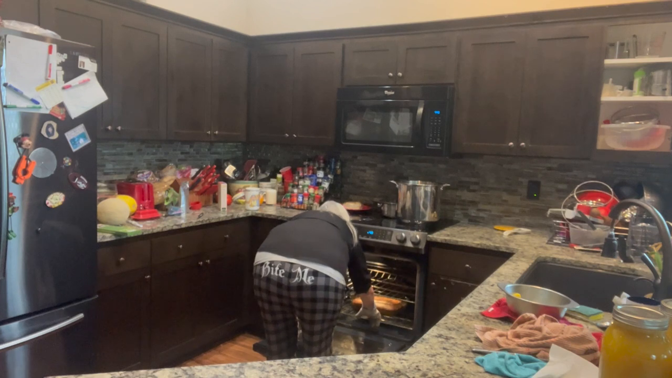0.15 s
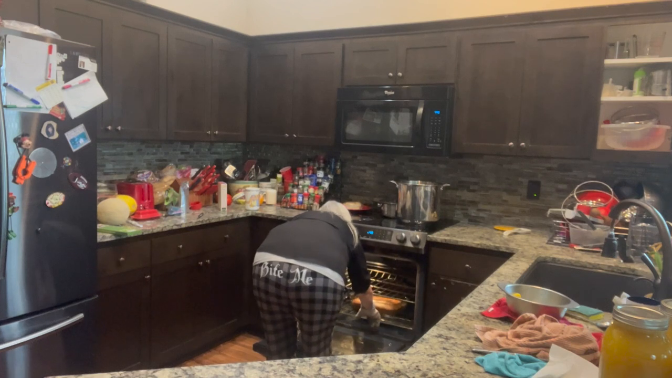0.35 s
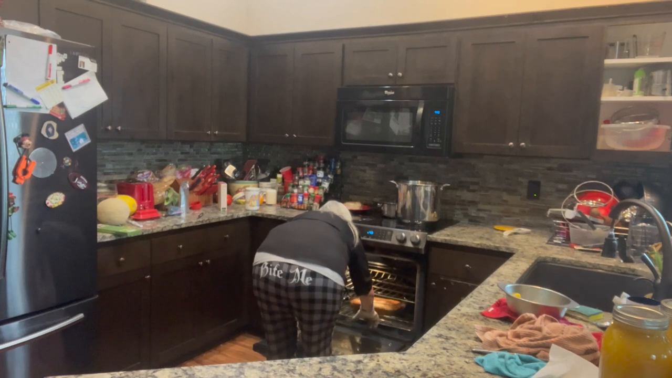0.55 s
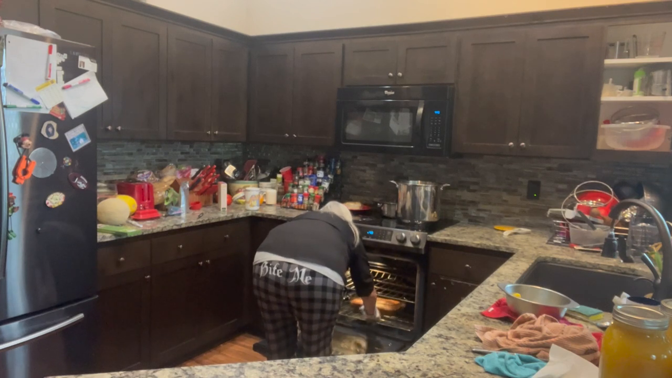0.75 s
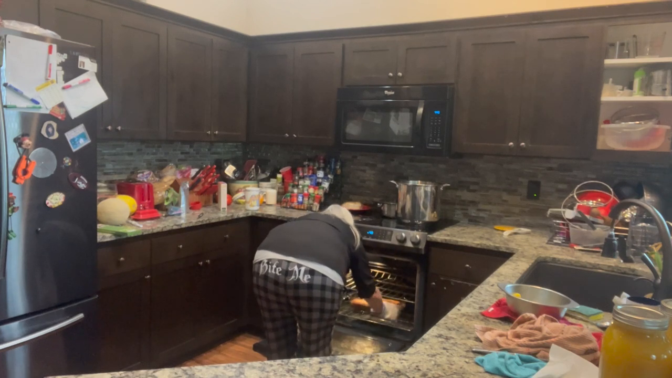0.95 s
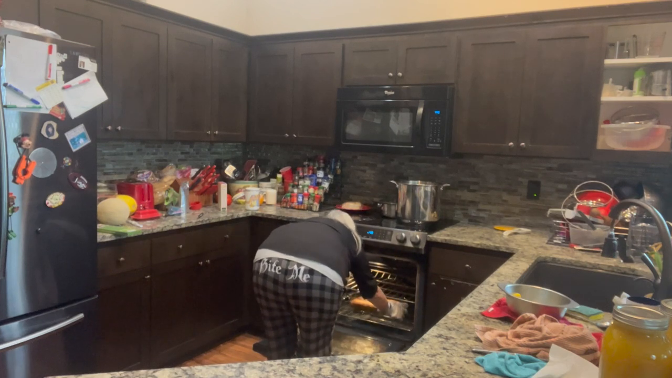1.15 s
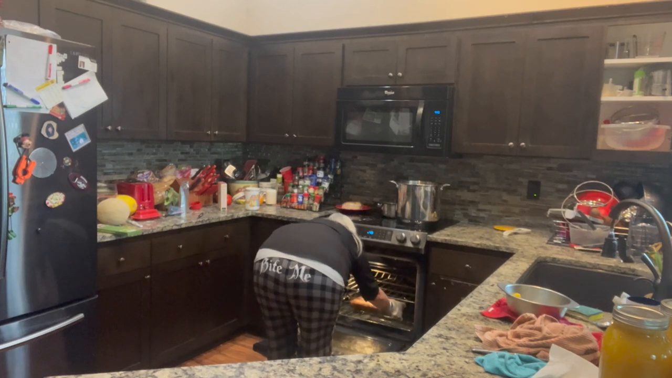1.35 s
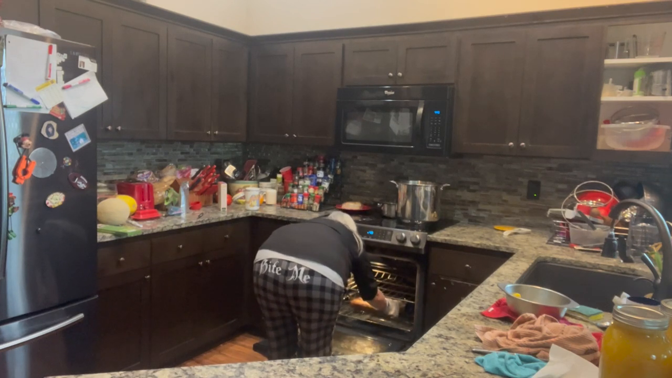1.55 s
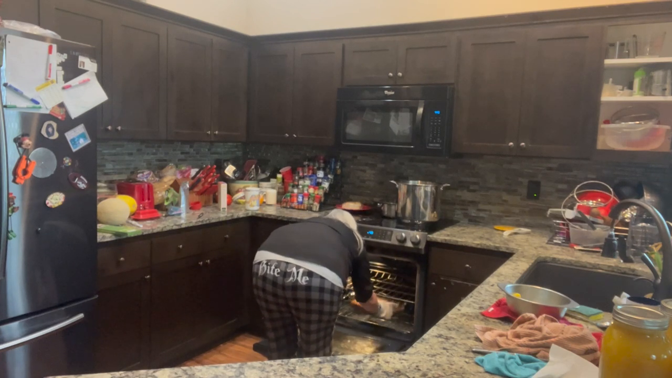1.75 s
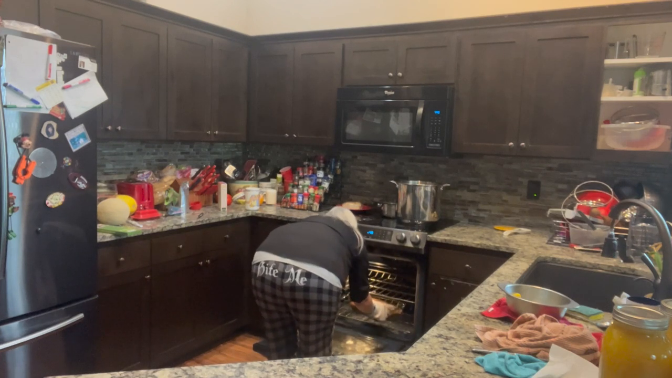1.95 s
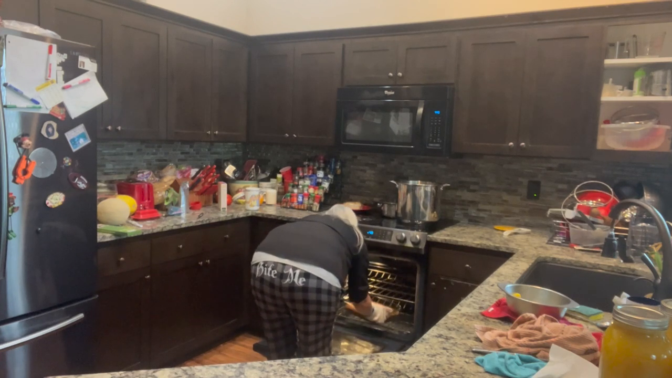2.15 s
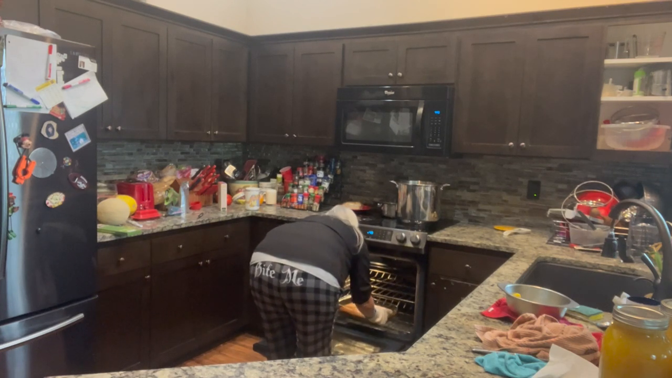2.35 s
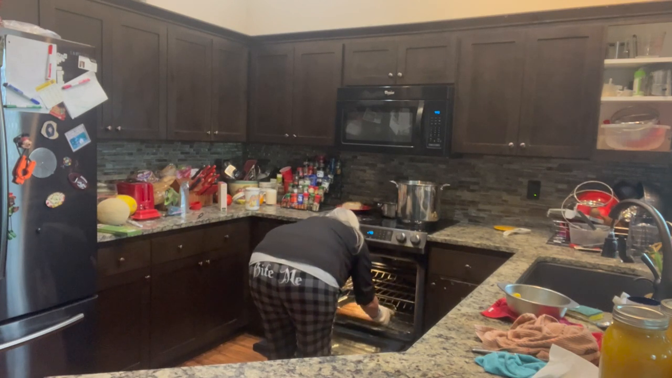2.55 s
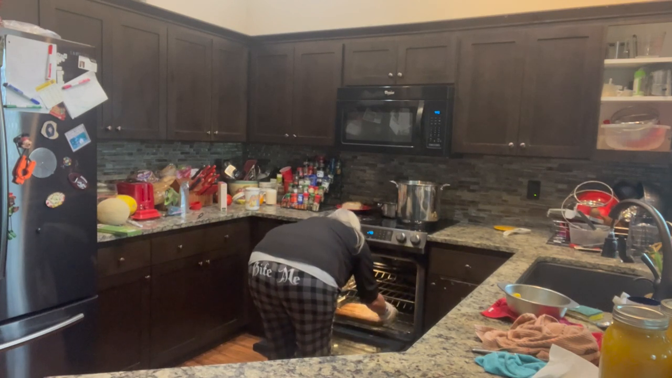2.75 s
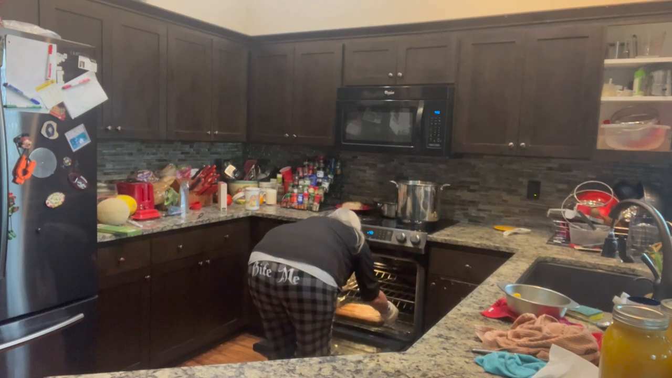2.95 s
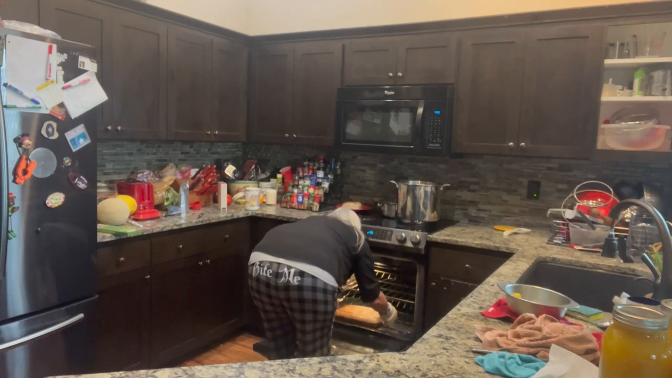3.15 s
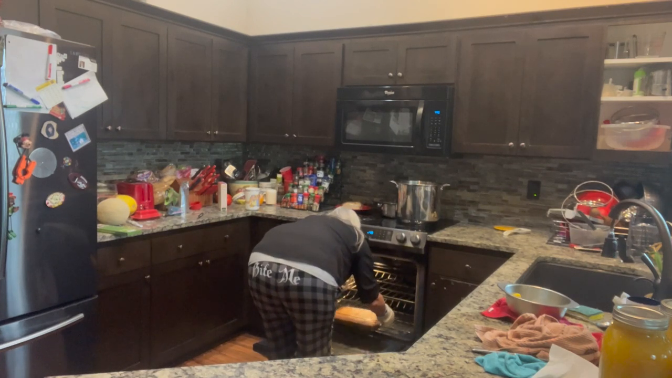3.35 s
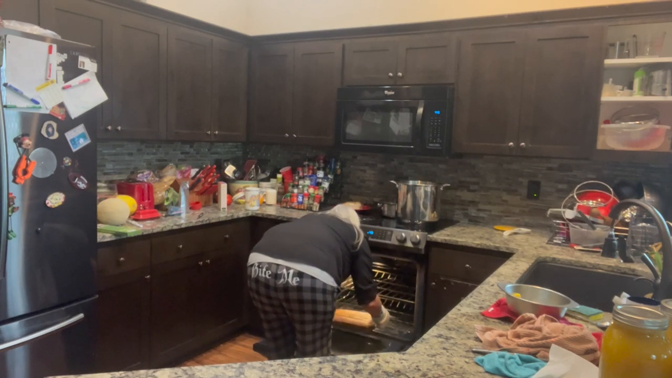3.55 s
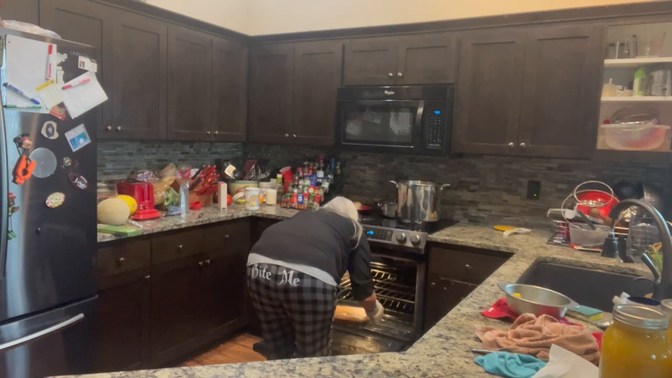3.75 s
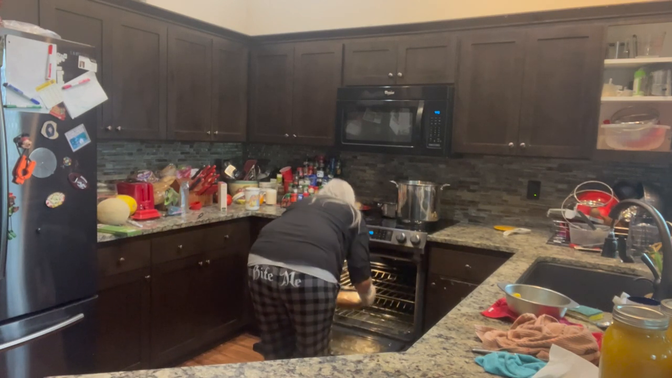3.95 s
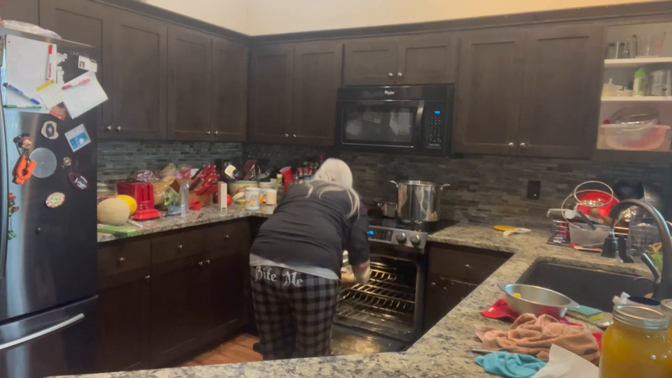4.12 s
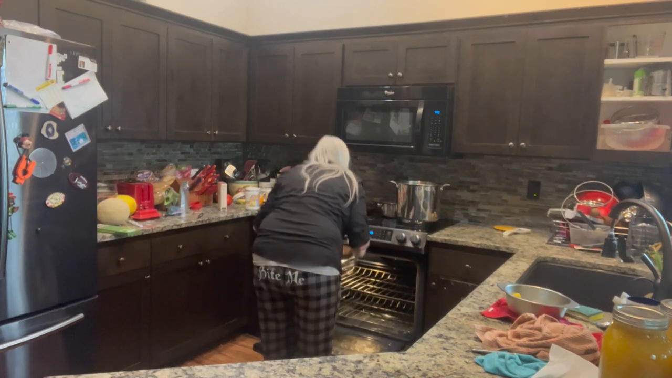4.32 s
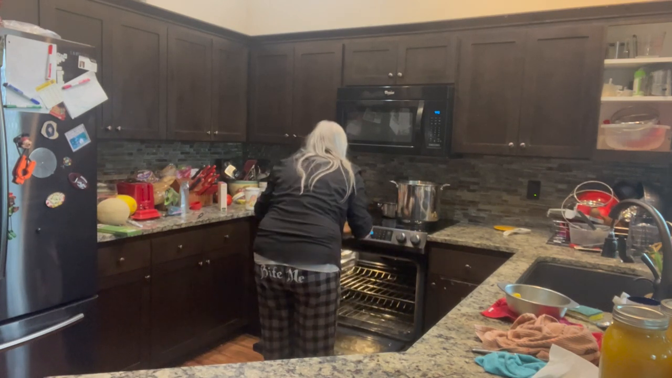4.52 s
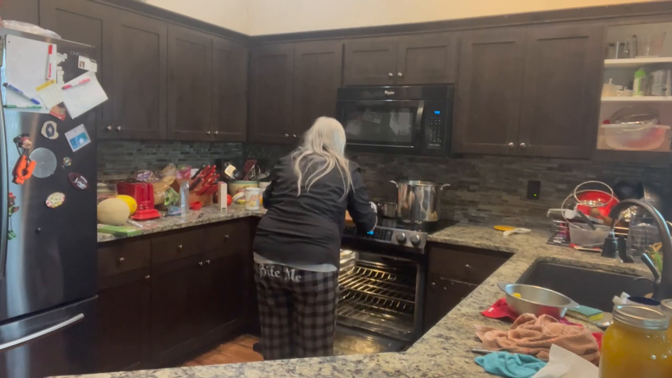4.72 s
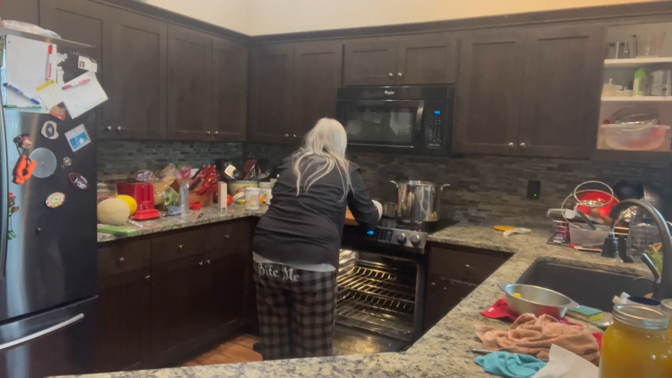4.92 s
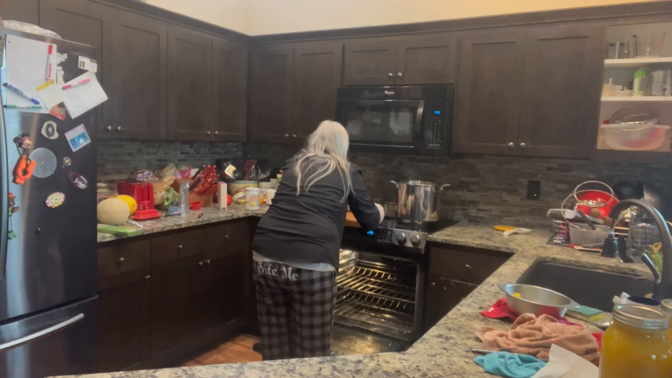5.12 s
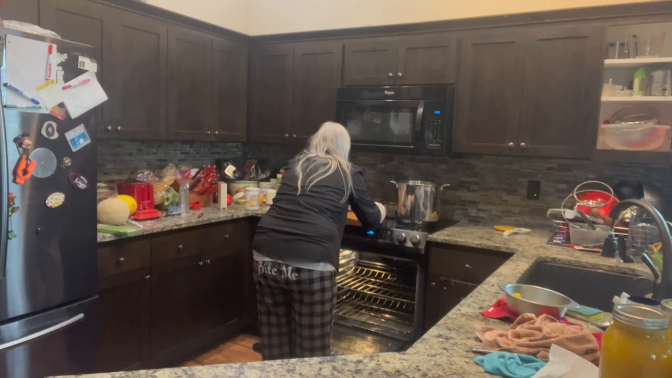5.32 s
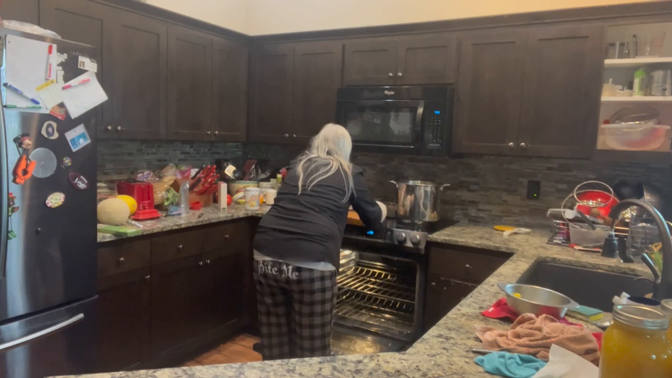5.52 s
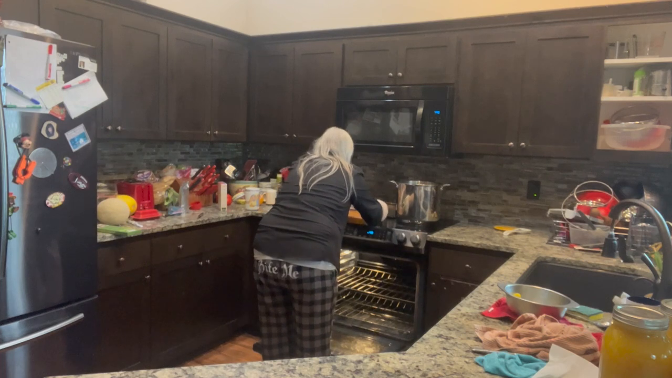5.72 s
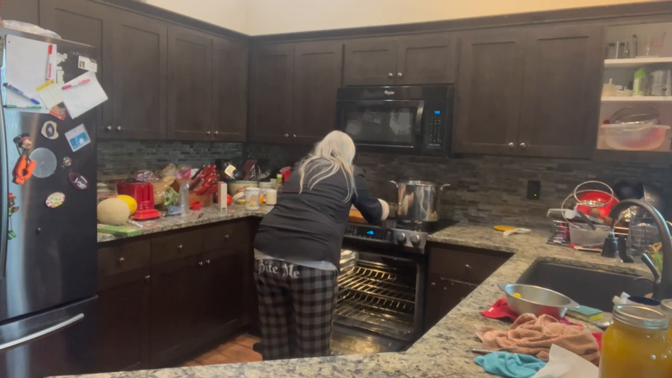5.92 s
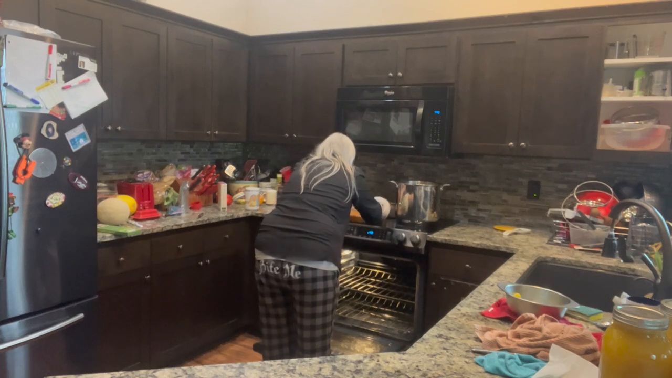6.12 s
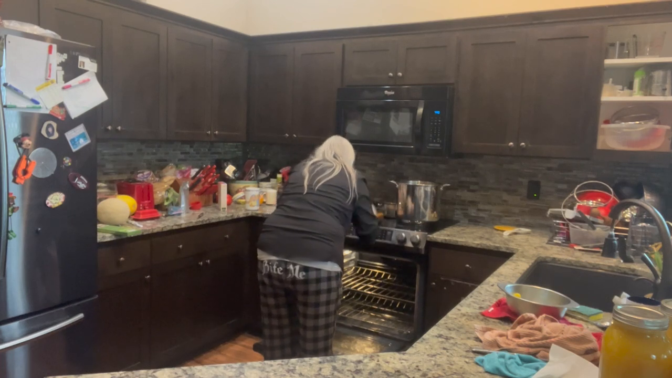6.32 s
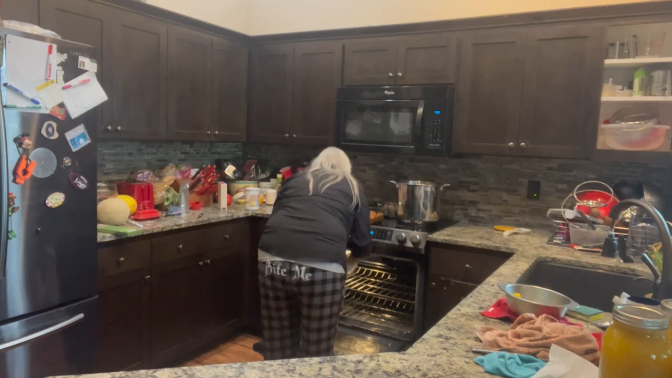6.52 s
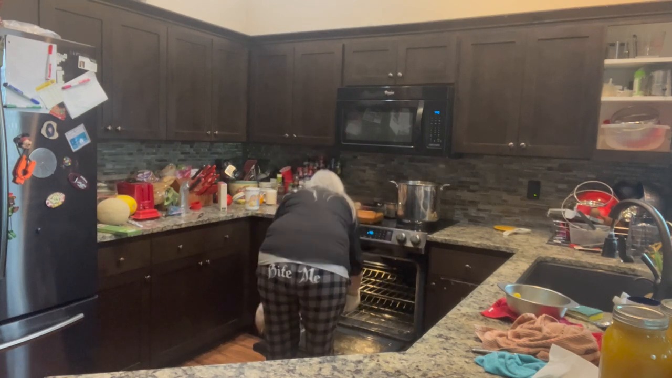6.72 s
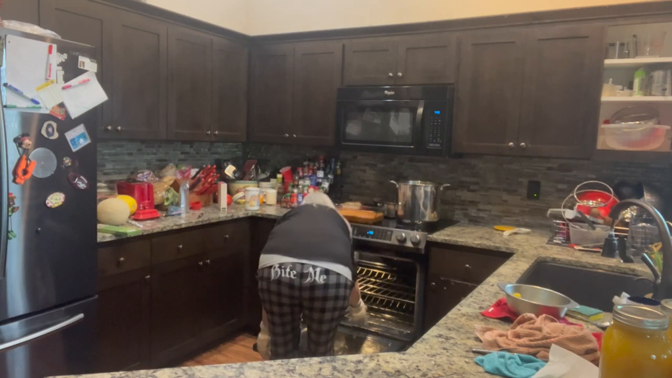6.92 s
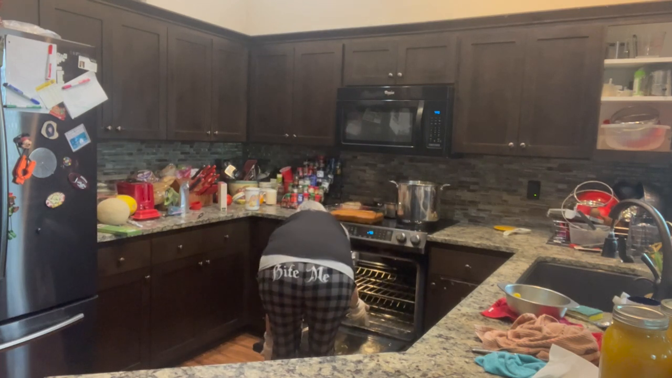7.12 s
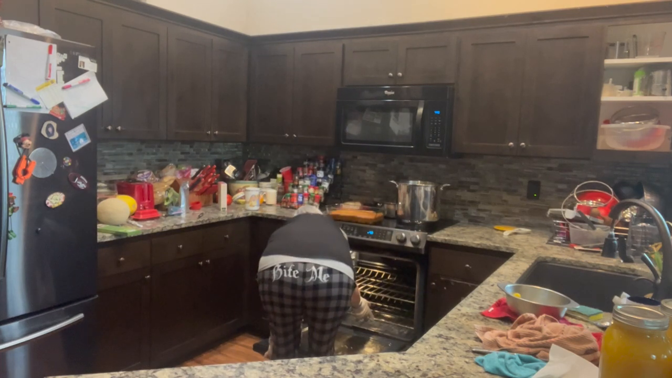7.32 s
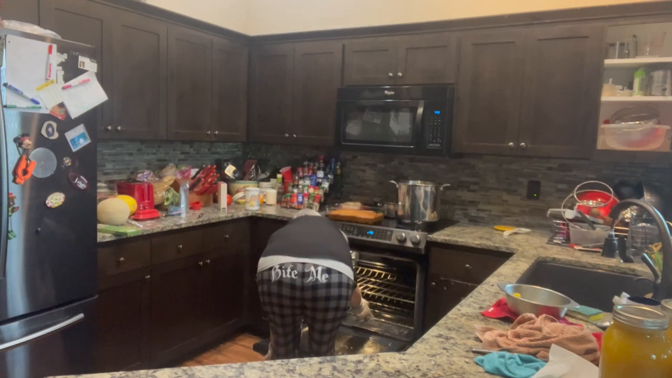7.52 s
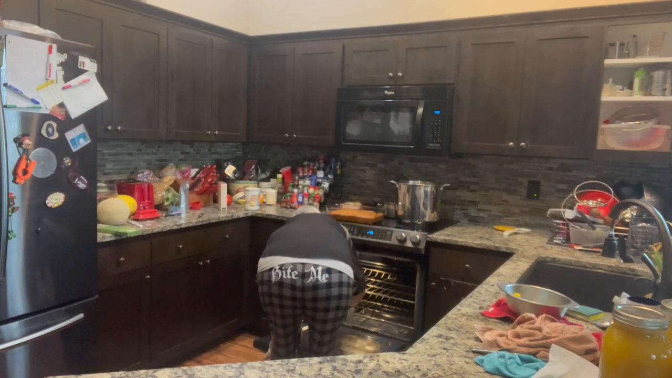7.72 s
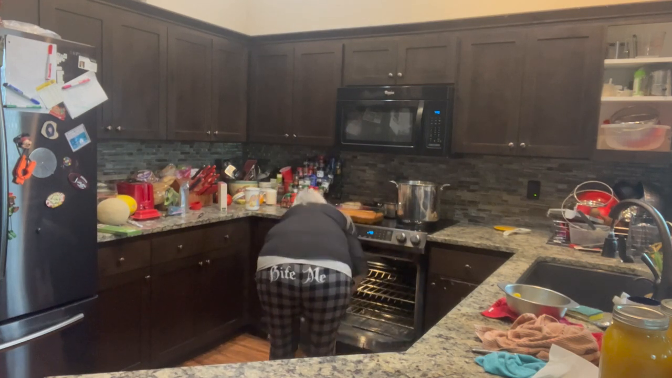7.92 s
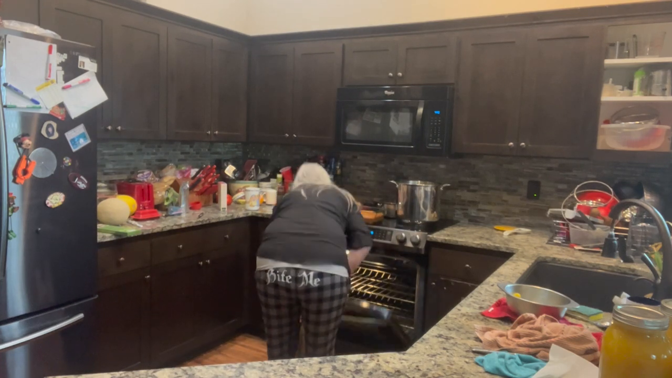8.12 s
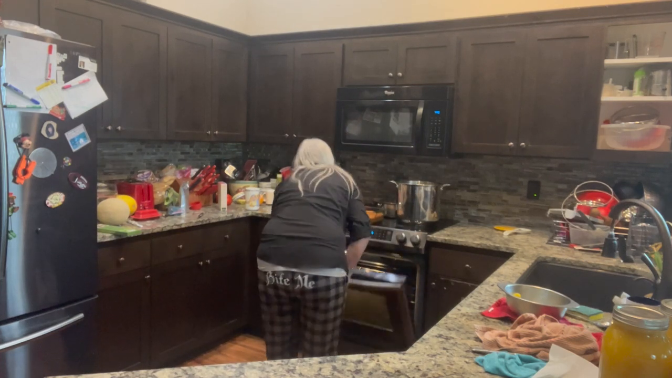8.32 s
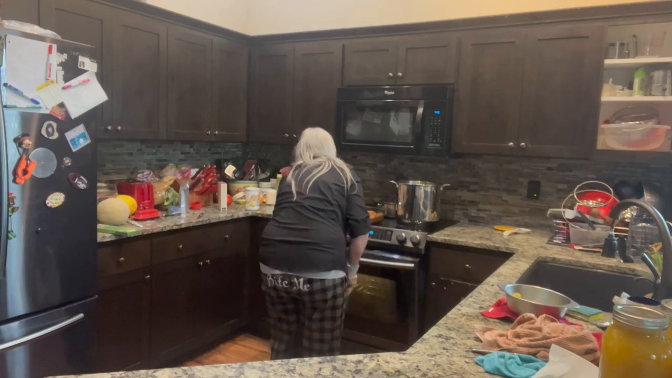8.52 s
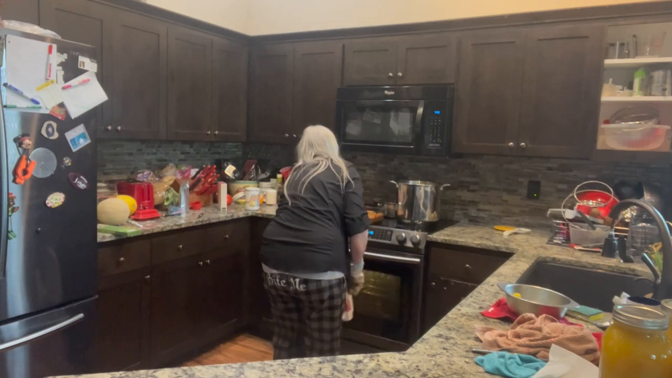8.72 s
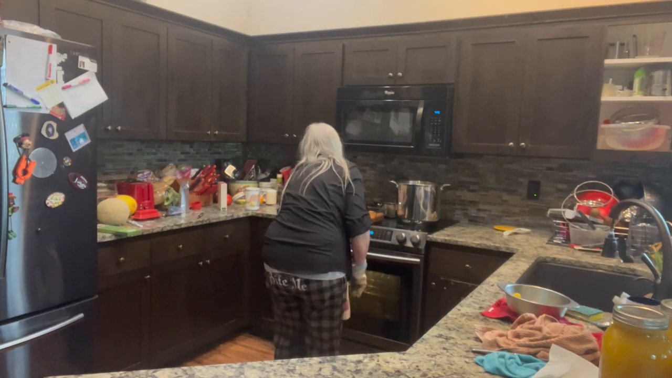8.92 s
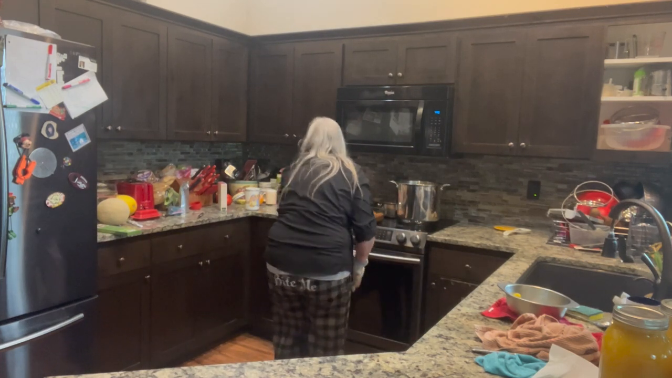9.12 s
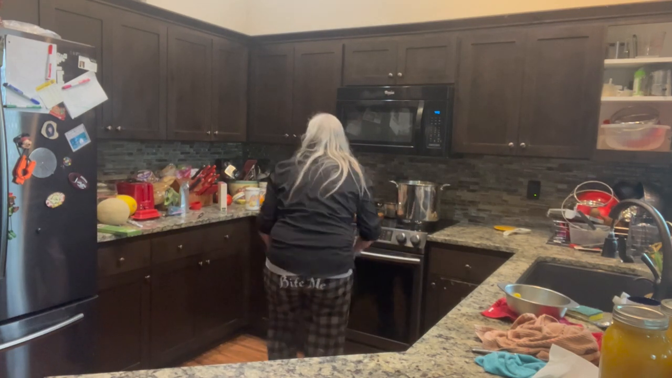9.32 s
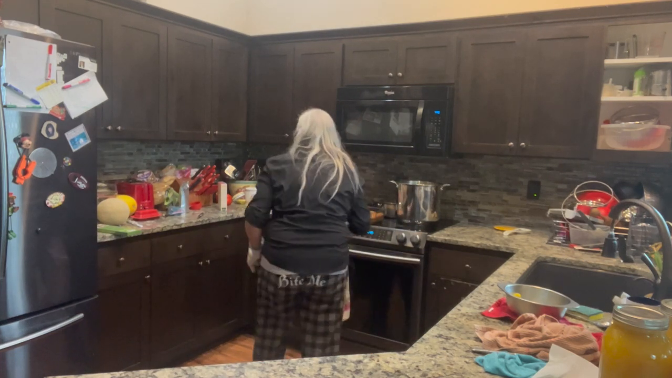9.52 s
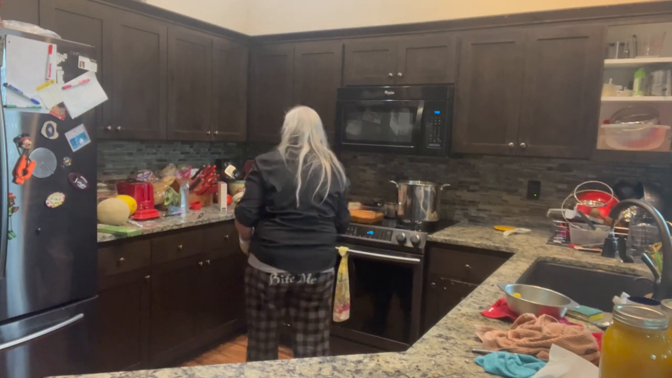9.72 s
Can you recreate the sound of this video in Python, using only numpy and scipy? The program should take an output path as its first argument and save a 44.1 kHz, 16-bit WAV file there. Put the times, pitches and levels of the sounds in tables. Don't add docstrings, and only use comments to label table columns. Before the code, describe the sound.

A home kitchen heard from across the counter on close stereo camera microphones: low appliance hum, faint hiss, and very faint fast lens ticking from about 2 s. At the start metal drags lightly, then at 0.4 s an oven rack jolts with a loud, dry double clank, its wires ringing on. A tiny ping and mitt rustle come near 1.1-1.3 s. At 1.7 s another knock, then scraping and squeaking wire until about 2.6 s; at 3.4 s the rack stops with a clank. Quiet ringing fades. At 5.1 s a pan lands on the stovetop with a hollow, booming thud, then slides and taps until 6.2 s. Soft cloth rustles at 6.4-6.9 s. From 7.0 s the rack scrapes back, ending in a loud ringing clash at 7.35 s. The door moves at 8.4 s with a click and squeak, slams with a deep metallic thump at 8.7-8.8 s, and settles with faint scrapes and a low thud near 9.55 s.

```python
import sys
import numpy as np
from scipy import signal
from scipy.fft import rfft, irfft, next_fast_len
from scipy.io import wavfile
from scipy.ndimage import uniform_filter1d, map_coordinates

SR = 44100
rng = np.random.default_rng(int(sys.argv[2]) if len(sys.argv) > 2 else 0)


def pcm_store(signal):
    levels = np.round(np.clip(np.atleast_2d(signal), -1, 1) * 32767)
    wavfile.write(sys.argv[1], SR, levels.astype(np.int16).T)


def attenuation_scalar(level_db):
    decades = np.asarray(level_db, float) / 20
    return 10 ** decades


N = 434826

# f/Hz, level/dB per Hz
SHEET_COLOUR = [(18, -36.5), (30, -14.5), (48, -18), (84, -2.5), (118, 0.5), (285, -11.5), (324, -12),
                (430, -9.5), (543, -13.5), (618, -11.5), (1010, -16.5), (4770, -31), (8200, -37),
                (10600, -45.5), (14500, -57.5)]
# f/Hz, correlation/-1..1
PORT_LIKENESS = [(60, 0.98), (130, 0.99), (290, .78), (620, 0.34), (1360, 0.3), (2950, -0.18),
                 (5500, 0.052), (7400, -0.88), (8300, -0.91), (9300, -0.54), (11000, 1), (12500, 0.2),
                 (14500, -.8)]
# f/Hz, left minus right/dB
PORT_BALANCE = [(60, -0.5), (150, -1.0), (370, -1.5), (920, -2), (2280, -1.5), (5660, -7), (14000, 3.5)]
BAND_EDGES_HZ = [25, 90, 250, 800, 1500, 2500, 4500, 8600, 16000]
BAND_COLOUR = [0, 0, 1, 2, 2, 3, 3, 4]


def unit(x):
    return x / np.sqrt(np.mean(x ** 2) + 1e-20)


def along(points, hz):
    f, v = np.transpose(points)
    return np.interp(np.log(hz + 1), np.log(f + 1), v)


def curves(rows, t):
    s, *columns = np.transpose(rows)
    return np.array([np.interp(t, s, column) for column in columns])


def wobble(rate):
    knots = rng.standard_normal(int(N * rate / SR) + 4)
    return map_coordinates(knots, [np.arange(N) * rate / SR])


def filtered(x, response):
    m = next_fast_len(x.shape[-1] + 8192)
    spectrum = rfft(x, m) * response(np.fft.rfftfreq(m, 1 / SR))
    return irfft(spectrum, m)[..., :x.shape[-1]]


def peaks(rows, f):
    total = 0
    for k, (centre, width, db) in enumerate(rows):
        damping = 1j * f * width
        total = total + (-1) ** k * attenuation_scalar(db) * damping / (centre * centre - f * f + damping + 1e-9)
    return total


def diffuse(gain, likeness, balance, size=N):
    def mid_side_gain(hz):
        turn = np.arccos(np.clip(along(likeness, hz), -1, 1)) / 2
        return gain(hz) * [np.cos(turn), np.sin(turn)]

    mid, side = filtered(rng.standard_normal((2, size)), mid_side_gain)
    ports = np.array([mid + side, mid - side])
    return unit(filtered(ports, lambda hz: attenuation_scalar(np.outer([.5, -.5], along(balance, hz)))))


def split(x, edges):
    edges = np.array(edges)[:, None, None]
    above = lambda hz: 1 / (1 + (edges / (hz + 1)) ** 10)
    return filtered(x, lambda hz: -np.diff(above(hz), axis=0))


def patchy(x, depth_db):
    z = signal.stft(x, nperseg=1024)[2]
    field = uniform_filter1d(rng.standard_normal(z.shape[1:]), size=6, axis=1)
    return signal.istft(z * attenuation_scalar(depth_db * unit(field)), nperseg=1024)[1][:, :x.shape[1]]


def flutter(seconds, rate):
    steps = np.arange(0, seconds, 32 / SR)
    knots = rng.standard_normal((4, int(seconds * rate) + 4))
    real, imag = np.array([map_coordinates(row, [steps * rate]) for row in knots]).reshape(2, 2, -1)
    return steps, real + 1j * imag


def voiced(swing, hz, size):
    share = np.clip(along(PORT_LIKENESS, hz), -1, 1)
    pair = np.array([swing[0], share * swing[0] + np.sqrt(1 - share ** 2) * swing[1]])
    pair = pair * attenuation_scalar(along(PORT_BALANCE, hz) * np.array([[.5], [-.5]]))
    pair = np.repeat(pair, 32, axis=1)[:, :size]
    turn = 2 * np.pi * hz * np.arange(size) / SR
    return pair.real * np.sin(turn) + pair.imag * np.cos(turn)


def tones(rows, rise):
    out, size = np.zeros((2, N + SR)), SR // 4
    for s, hz, db, t60 in rows:
        t, waver = flutter(.26, rate=25 + .01 * hz)
        swing = attenuation_scalar(db - 60 * t / t60) * (1 - np.exp(-t / rise)) * (0.7 + 0.21 * waver)
        swing = swing * np.cos(np.pi / 2 * t / t[-1])
        out[:, round(s * SR):][:, :size] += voiced(swing, hz, size)
    return out[:, :N]


def appliances():
    # f/Hz, width/Hz, level/dB
    motor_peaks = [(67, 8.6, 6), (130.7, 13, -1), (230, 38, -10.5)]
    # f/Hz, level/dB per Hz
    air_colour = [(18, -50.5), (30, -18.5), (74, 0.5), (150, -20.5), (177, -17.5), (282, -11), (365, -18.5),
                  (439, -15.5), (2500, -42), (3250, -76), (5500, -120)]
    # f/Hz, level/dB per Hz
    hiss_colour = [(710, -31), (1200, -20), (1560, -16.5), (1680, -9.5), (2710, -8), (6560, -5.5),
                   (7920, -9.5), (8600, -13), (9550, -2.5), (10200, -0.5), (11900, -9.5), (13300, -21),
                   (14500, -44.5)]
    # f/Hz, correlation/-1..1
    still_likeness = [(60, 0.98), (130, 0.69), (290, .52), (620, -0.28), (2950, 0.012), (6000, -0.23),
                      (8200, -0.9), (9400, -0.18), (11000, 0.62), (14000, -.2)]
    # f/Hz, left minus right/dB
    still_balance = [(60, -2.5), (180, -5), (530, -4), (1580, -1), (4720, -6), (14000, 2.5)]
    # t/s, level/dB
    frame_jolts = [
        (0, -61),
        (0.42, -47.5),
        (1.75, -52.5),
        (3.38, -58),
        (5.15, -49),
        (5.75, -69.5),
        (7.33, -46),
        (8.37, -48),
        (8.71, -43.5),
    ]
    rise_s, t60_s, stride = 0.051, 1.4, 64
    jolt_s, jolt_db = np.array(frame_jolts).T[:, :, None]
    coarse = np.arange(0, N, stride)
    since = np.clip(coarse / SR - jolt_s, 0, None)
    shudder = np.sum(attenuation_scalar(jolt_db - 60 * since / t60_s) * (1 - np.exp(-since / rise_s)), axis=0)
    shudder = np.interp(np.arange(N), coarse, shudder)

    hum = diffuse(lambda hz: np.abs(peaks(motor_peaks, hz)), still_likeness, still_balance)
    air = diffuse(lambda hz: attenuation_scalar(along(air_colour, hz)), still_likeness, still_balance)
    hiss = diffuse(lambda hz: attenuation_scalar(along(hiss_colour, hz)), still_likeness, still_balance)
    hum_gain = attenuation_scalar(-63) + attenuation_scalar(-3) * shudder
    air_gain = (attenuation_scalar(-69) + shudder) * attenuation_scalar(0.97 * wobble(4.6))
    return hum_gain * hum + air_gain * air + attenuation_scalar(-80.0) * hiss


def lens_motor():
    # t/s, big step level/dB, chance of a half-way step/0..1, small step level/dB
    motor_runs = [(2.2, -90, .15, -85), (2.4, -58.5, 0.17, -95), (4.5, -59, 0.15, -99),
                  (6.3, -57.5, 0.2, -93), (6.44, -61, 0.8, -66), (6.85, -61, .9, -65.5),
                  (6.92, -56.5, 0, -76), (9.86, -57, 0, -74.5)]
    step_s, first_step_s = .00500525, .0073
    k = np.arange(int(N / SR / step_s) - 2)
    s = first_step_s + k * step_s
    big_db, chance, small_db = curves(motor_runs, s)
    luck = rng.random(len(k))
    scatter, bend, bend2 = rng.standard_normal((3, len(k), 1))
    big = (k % 8 == 0) | ((k % 8 == 4) & (luck < chance))
    step_db = np.where(big, big_db + 1.5 * scatter[:, 0], small_db + 3 * scatter[:, 0])
    size = attenuation_scalar(step_db) * (s > motor_runs[0][0])

    t = np.arange(SR // 300) / SR
    whine = np.sin(2 * np.pi * 10100 * (1 + .015 * bend) * t)
    whine = whine + .7 * np.sin(2 * np.pi * 11800 * (1 + .04 * bend2) * t)
    ticks = size[:, None] * attenuation_scalar(-60 * t / .0025) * (1 - np.exp(-t / .00015)) * whine
    where = np.round(s * SR).astype(int)[:, None] + np.arange(len(t))
    housing = lambda hz: 1 / (1 + (8900 / (hz + 1)) ** 24) / (1 + (hz / 13500) ** 12)
    return 1.9 * filtered(np.bincount(where.ravel(), ticks.ravel(), N), housing)


def rustles():
    # t/s, length/s, f/Hz, width/Hz, level/dB
    brushes = [(1.03, 0.18, 9900, 2200, -80.5), (1.278, 0.036, 10200, 2000, -80),
               (6.36, 0.35, 4700, 900, -84), (6.33, 0.19, 960, 400, -81), (6.83, .05, 5000, 900, -84),
               (6.57, .1, 720, 200, -82), (6.42, 0.59, 10400, 800, -78.5)]
    out, size = np.zeros((2, N)), SR // 2
    for s, length, hz, width_hz, db in brushes:
        weave = lambda f: np.abs(peaks([(hz, width_hz, 0)], f)) ** 2
        cloth = diffuse(weave, PORT_LIKENESS, PORT_BALANCE, size=size)
        u = np.clip(np.arange(size) / SR / length, 0, 1)
        grain = attenuation_scalar(db + 2.2 * wobble(59)[:size])
        out[:, round(s * SR):][:, :size] += grain * np.sin(np.pi * u ** 0.75) * cloth
    return out


def drone():
    # t/s, level/dB
    load = [(2.2, -78), (2.45, -62.5), (3.0, -57), (3.3, -59.5), (3.7, -59), (4.3, -73.5)]
    t, waver = flutter(N / SR + .01, rate=8)
    level_db, = curves(load, t)
    loaded = (t > load[0][0]) * (t < load[-1][0])
    return voiced(attenuation_scalar(level_db) * loaded * (0.66 + 0.24 * waver), 140.5, N)


def wires():
    # f/Hz, level/dB, t60/s
    wire_modes = [(121.5, 8.5, 1.68), (139.3, -3, 2), (632, -10, 3), (662, -8, 2.5), (682, -10, 2.5),
                  (714, -7.5, 2.5), (1200, -17, 1), (1325, -9.5, 1.47), (1760, -13.5, 1.3),
                  (1830, -4, 1.52), (1965, -4, 1.5), (2250, -13.5, 1.2), (3630, -15, 1), (3860, -7, 1)]
    # t/s, level/dB, tilt/dB an octave
    rack_jolts = [
        (-.05, -63.5, -2.5),
        (0.391, -52.5, -1.5),
        (1.72, -61, -10),
        (2.3, -70.5, 1),
        (3.379, -58.5, -1.5),
        (7.351, -45, 1),
    ]
    out = np.zeros((2, N))
    for hz, mode_db, t60 in wire_modes:
        t, waver = flutter(N / SR + .01, rate=8 + .04 * hz)
        octaves = np.log2(max(hz / 700, 1))
        swing = 0
        for s, db, tilt_db in rack_jolts:
            swing = swing + attenuation_scalar(db + tilt_db * octaves + mode_db - 60 * np.abs(t - s) / t60) * (t > s)
        beating = 0.2 + 60 / hz + 0.7 * min(hz / 600, 1) * waver
        out += voiced(swing * beating, hz, N)
    return out


def singing_and_thumps():
    # t/s, f/Hz, level/dB, t60/s
    sung = [(1.57, 3250, -59, 0.32), (1.6, 2380, -60, .25), (1.6, 1500, -60, .3), (2.105, 3000, -54, .15),
            (2.12, 5800, -55, .15), (2.17, 830, -54, 0.32), (2.19, 1350, -55, .3), (2.17, 4880, -59, .15),
            (2.23, 760, -47.5, 0.22), (2.25, 1280, -50, 0.22), (2.295, 2920, -54, 0.21),
            (2.37, 960, -52, 0.25), (2.385, 2240, -55, 0.34), (2.385, 1300, -54, 0.35),
            (2.395, 1730, -55, .2), (2.38, 2900, -54, .15), (2.47, 3230, -57, 0.22),
            (3.02, 4880, -74, 0.26), (3.2, 2930, -50, .2), (3.3, 3900, -58.5, .15),
            (7.2, 3300, -51.5, 0.19), (7.21, 4900, -52, .15), (8.88, 3250, -54, 0.33),
            (3.265, 1700, -56, .15), (2.7, 1300, -66, .3), (2.31, 2930, -51, .2), (2.2, 5400, -60, 0.25),
            (7.228, 136, -31.5, 0.36), (7.28, 150, -29, .25), (7.325, 137, -29, 0.22),
            (7.375, 200, -27, .1), (8.8, 200, -31.5, 0.24), (8.722, 150, -26, 0.4), (.53, 150, -29.5, 0.24),
            (.7, 191, -44.5, 0.22), (4.85, 209.5, -57, .3), (7.6, 1700, -70, .8), (7.7, 1850, -69, .8),
            (8.87, 2240, -57, 0.47), (9.2, 2200, -69, 0.59), (5.76, 4200, -62, .3), (9.0, 640, -58, 0.56)]
    return tones(sung, rise=0.0078)


def sliding():
    # t/s, pressure/dB, speed/dB
    strokes = [
        [(0.0, -48, -1), (0.126, -60.5, -3.5), (0.288, -80.5, -8), (0.332, -77, 1), (0.36, -49, 2.5)],
        [(1.45, -65.5, -25), (1.622, -64.5, 5), (1.724, -49, -5.5), (1.832, -52.5, -4.5), (2.024, -64.5, 6),
         (2.174, -55.5, 1.5), (2.454, -59, 2), (2.622, -67.5, 2), (2.8, -90, -7)],
        [(2.9, -85, -7), (3.046, -69.5, 3.5), (3.29, -68, 10), (3.37, -61.5, 3.5)],
        [(5.3, -65.5, 2), (5.478, -54, -5), (5.684, -61, 0.5), (5.692, -54.5, 2.5), (5.9, -53, -3),
         (6.048, -57, -11.5), (6.145, -96.5, 2)],
        [(7.03, -71, -2), (7.098, -49.5, -8.5), (7.208, -49.5, 1), (7.232, -39.5, -4), (7.332, -31, -10)],
        [(8.5, -53, -8), (8.59, -77, -20), (8.7, -65.5, 3)],
        [(8.95, -59, -2), (9.132, -62.5, -7), (9.33, -71, -7)],
    ]
    # t/s, pressure/dB, speed/dB
    faint_strokes = [
        [(.69, -54.5, -5), (.8, -59.5, -18), (.95, -82, -24)],
        [(6.05, -75, -7), (6.2, -84.5, -13)],
        [(9.3, -76, -2.5), (9.5, -85, -4)],
        [(5.075, -78, 4), (5.09, -61, 2)],
        [(6.25, -89.5, -4), (6.5, -84.5, -3), (6.75, -92, 4)],
        [(7.7, -80, 3), (8.1, -80.5, 2.5), (8.35, -70.5, -2)],
    ]
    # f/Hz, width/Hz, level/dB
    rub_peaks = [(744, 300, -10.5), (1330, 110, -5), (2170, 49, -20), (3090, 94, -4), (3730, 30, -1.5),
                 (4930, 46, -1), (5800, 130, -8.5), (6850, 99, -1)]
    # level at the usual pressure/dB, growth with pressure/dB per dB, with speed/dB per dB
    stroke_bands = [
        (-58, 0.69, 0),
        (-60, 0.99, 0.083),
        (-61, 0.9, 0.8),
        (-69.5, 1, 1.2),
    ]
    usual_pressure_db = -60
    t = np.arange(N) / SR
    sing = lambda hz: attenuation_scalar(along(SHEET_COLOUR, hz)) * (1 + np.abs(peaks(rub_peaks, hz)))
    scrape = patchy(diffuse(sing, PORT_LIKENESS, PORT_BALANCE), depth_db=3)
    bands = split(scrape, [25, 250, 1500, 8000, 16000])
    catches = attenuation_scalar(.8 * wobble(25) + 1.5 * wobble(170))
    level = np.zeros((4, N))
    usual_db, pressed, hurried = np.transpose(stroke_bands)[:, :, None]
    for rows in strokes + faint_strokes:
        start, end = rows[0][0], rows[-1][0]
        span = slice(max(0, round((start - .02) * SR)), round((end + .03) * SR))
        pressure_db, speed_db = curves(rows, t[span])
        touch = np.clip(np.minimum(t[span] - start + 0.01, end - t[span] + 0.024) / 0.0061, 0, 1)
        stroke_db = usual_db + pressed * (pressure_db - usual_pressure_db) + hurried * speed_db
        level[:, span] += attenuation_scalar(stroke_db) * touch
    return sum(gain * unit(band * catches) for gain, band in zip(level, bands))


def panels_and_squeaks():
    # t/s, level/dB
    hob_thumps = [
        (5.104, -13.5),
        (5.455, -45),
        (5.5, -32),
        (5.863, -40.5),
        (5.91, -45),
        (6.186, -39.5),
    ]
    # t/s, f/Hz, level/dB, t60/s
    panel_thumps = [(.42, 115, -33, 0.78), (1.943, 137, -45, 0.15), (5.094, 360, -21, 0.17),
                    (5.099, 440, -34.5, 0.093), (7.056, 118, -45, 0.98), (7.23, 540, -34, 0.29),
                    (7.35, 540, -15.5, 0.12), (7.373, 115, -21, 0.11), (8.372, 351, -38.5, 0.27),
                    (8.69, 29, -25.5, 0.52), (8.71, 57.2, -22, 0.77), (8.791, 138.2, -23.5, 0.26),
                    (9.56, 56, -31.5, 0.48)]
    # f/Hz, level/dB, t60/s
    tray_modes = [(340, -59, 0.89), (490, -53.5, 0.55), (870, -51, 0.35), (930, -51.5, 0.35),
                  (1250, -55, 0.24), (2420, -68, .4), (2620, -68, .35), (2840, -61, 0.35),
                  (4950, -66, 0.16), (5200, -69, 0.16)]
    # t/s, f/Hz, level/dB, t60/s
    squeaks = [(0.353, 3250, -44, .3), (2.12, 4880, -57, 0.65), (2.19, 2250, -49, 0.17),
               (2.305, 2930, -47, 0.19), (3.041, 1130, -62, 0.33), (3.205, 2940, -51, .15),
               (3.268, 1725, -51, 0.11), (8.459, 1520, -43, 0.21), (8.734, 3180, -33, .2),
               (8.8, 3200, -31.5, 0.106), (8.805, 2200, -47, 0.49)]
    out, size = np.zeros((2, N + SR)), SR // 2
    hob = [(s, 128.8, db, 0.2) for s, db in hob_thumps]
    tray = [(1.331, *mode) for mode in tray_modes]
    for s, hz, db, t60 in hob + panel_thumps + tray + squeaks:
        rise = 0.0074 if hz > 1000 else 0.0048 * (1 + (150 / hz) ** 2)
        t, waver = flutter(.51, rate=0.11 * hz)
        smear = np.clip(hz / 2500, 0, .45)
        swing = attenuation_scalar(db - 60 * t / t60) * (1 - np.exp(-t / rise)) * (1 - smear + smear * waver)
        out[:, round(s * SR):][:, :size] += voiced(swing, hz, size)
    return out[:, :N]


def knocks():
    # t/s, f/Hz, level/dB, t60/s
    dry_knocks = [(.384, 875, -22, 0.08), (.384, 1500, -25, 0.06), (.388, 1024, -27.5, 0.25),
                  (.392, 530, -33, 0.077), (.457, 540, -26, 0.08), (.458, 1040, -28.5, .06),
                  (.699, 520, -47, .1), (1.718, 498.6, -35, 0.18), (1.718, 1080, -48, .1),
                  (1.718, 1545, -35.5, 0.089), (1.749, 528, -38.5, 0.096), (3.368, 403, -38, 0.19),
                  (3.368, 1090, -38, 0.11), (3.368, 1620, -44, .1), (3.37, 5150, -52, .08),
                  (3.37, 500, -44, .15), (3.37, 3250, -45, .1), (5.093, 1570, -27.5, 0.036),
                  (5.101, 3250, -31, 0.11), (5.108, 2500, -40, 0.085), (5.101, 5040, -35, 0.065),
                  (5.135, 2950, -35.5, 0.12), (5.69, 1040, -47, .08), (7.023, 598, -48.5, 0.13),
                  (7.084, 554, -44, .1), (7.126, 540, -44.5, 0.11), (7.266, 513, -29.5, 0.14),
                  (7.266, 1230, -38, 0.094), (7.336, 596, -30.5, 0.054), (7.354, 1320, -31.5, .06),
                  (7.381, 1240, -39, 0.09), (8.373, 2200, -42, 0.066), (8.47, 1130, -44, .12),
                  (8.733, 470, -34, 0.086), (8.805, 362, -33.5, .1), (5.096, 480, -33.5, .1),
                  (5.149, 329, -28, 0.17), (5.11, 554, -26.5, .15), (7.023, 1490, -55, 0.11),
                  (7.084, 1225, -50, .12), (7.02, 2280, -60, .1), (7.02, 3200, -62, .1),
                  (5.69, 1990, -51, .08), (.385, 2424, -35.5, 0.11), (.385, 647, -26.5, .05),
                  (8.8, 2236, -47, 0.24), (8.457, 483, -40, 0.083), (7.23, 1600, -46, .1),
                  (7.23, 2390, -46, .1), (7.39, 2010, -35.5, .1), (.412, 1050, -30, .05)]
    return tones(dry_knocks, rise=0.00069)


def snaps(sizzle):
    # t/s, level/dB
    edge_snaps = [
        (0.388, -46),
        (.47, -47.5),
        (2.11, -57),
        (5.688, -49.5),
        (7.335, -50.5),
        (8.455, -52.5),
        (8.699, -40.5),
    ]
    t60_s, rise_s = 0.42, 0.0018
    out, t = np.zeros((2, N + SR)), np.arange(SR // 2) / SR
    shape = attenuation_scalar(-60 * t / t60_s) * (1 - np.exp(-t / rise_s))
    for s, db in edge_snaps:
        burst = sizzle[:, rng.integers(SR):][:, :len(t)]
        out[:, round(s * SR):][:, :len(t)] += attenuation_scalar(db) * shape * burst
    return out[:, :N]


def struck(hits, modes, echoes, crash, ring_db, rise, blow_t60, blow_db, boom_db, sizzle_db):
    # f/Hz, t60/s
    kitchen_t60 = [(60, 0.34), (200, 0.64), (700, 0.52), (2000, 0.66), (5000, 0.66), (11000, 0.37)]
    size = 3 * SR // 5
    out, t = np.zeros((2, N + 2 * SR)), np.arange(size) / SR
    centres = np.sqrt(np.multiply(BAND_EDGES_HZ[1:], BAND_EDGES_HZ[:-1]))[:, None, None]
    dying = attenuation_scalar(-60 * t / along(kitchen_t60, centres))
    slow = 1 + 300 / centres
    blow = attenuation_scalar(blow_db - 60 * t / (blow_t60 * slow))
    shape = (dying + blow) * (1 - np.exp(-t / (rise * slow))) * np.cos(np.pi / 2 * t / t[-1])
    paths = dying * (1 - np.exp(-t / 0.0041)) + attenuation_scalar(12.0 - 60 * t / 0.092)
    hz, mode_db, t60 = np.transpose(modes)[:, :, None]
    fading = attenuation_scalar(mode_db - 60 * t / t60) * (1 - np.exp(-t / 0.0016))
    for s, db, weight_db, sharp_db in hits:
        colour = attenuation_scalar([weight_db + boom_db, weight_db, 0, sharp_db, sharp_db + sizzle_db])[BAND_COLOUR]
        push = [(120, weight_db + boom_db), (500, weight_db), (1500, 0.027), (4500, sharp_db)]
        push_db = along(push, hz) + rng.normal(0, 4.2, hz.shape)
        detune = 1 + rng.normal(0, 0.0047, hz.shape)
        ring = attenuation_scalar(push_db[:, 0] + ring_db) @ (fading * np.sin(2 * np.pi * hz * t * detune))
        tail = (echoes[..., rng.integers(SR):][..., :size] * paths).sum(0)
        tail = tail / np.linalg.norm(tail[0])
        burst = crash[..., rng.integers(SR):][..., :size] * shape
        start = round(s * SR)
        out[:, start:][:, :2 * size - 1] += attenuation_scalar(db) * signal.fftconvolve(ring[None], tail, axes=1)
        out[:, start:][:, :size] += attenuation_scalar(db) * np.tensordot(colour, burst, 1)
    return out[:, :N]


def clatter():
    # t/s, peak level/dB, weight/dB, sharpness/dB
    rack_hits = [(0.352, -39.5, -3, -0.5), (0.384, -19, -2, -8.5), (0.458, -24.5, 2, -7),
                 (0.538, -31.5, -2, -8.5), (1.326, -49, 4.5, -15.5), (1.716, -28, -3.5, -8),
                 (2.103, -63, 0, 15), (2.3, -50.5, -3, 6), (3.367, -30, -5, -8.5), (3.419, -33.5, 0, -12.5),
                 (7.019, -43.5, -4, -17.5), (7.079, -40.5, 0, -26), (7.222, -39, 1, -10.5),
                 (7.333, -20.5, -2, -2), (7.352, -20, 0.5, -4.5), (7.379, -25.5, 0.5, -12)]
    # t/s, peak level/dB, weight/dB, sharpness/dB
    pan_hits = [(4.851, -71, 12.5, -1.5), (5.092, -24, 5.5, -2), (5.149, -47.5, 6, 10.5),
                (5.447, -47.5, 12, -4), (5.499, -67, 16, 15), (5.689, -40, -8, -19), (5.771, -48.5, -17, 3),
                (5.859, -48.5, 9, -11), (5.91, -57, 11.5, -13.5), (6.19, -83.5, 19, -10)]
    # t/s, peak level/dB, weight/dB, sharpness/dB
    door_hits = [(8.138, -67.5, -14, 6), (8.359, -37, 2.5, -3.5), (8.453, -33.5, 1.5, -3.5),
                 (8.697, -35.5, -1, 7), (8.722, -28, 3.5, -3.5), (8.801, -33.5, 2, -9),
                 (9.331, -65.5, 9.5, 9), (9.549, -52, 3, 4.5)]
    # f/Hz, level/dB, t60/s
    rack_modes = [(123, 2, 0.12), (402.4, -7, 0.49), (540, 4, 0.17), (944, 2, 0.13), (1090, -16, 0.1),
                  (1237, -15, 0.27), (1402, -19, 0.58), (1604, -10.5, 0.21), (2250, -16, .4),
                  (2340, -19, 0.1), (2900, -28.5, .3), (3250, -16, 0.3), (4100, -21, 0.28),
                  (5000, -33.5, .2)]
    # f/Hz, level/dB, t60/s
    pan_modes = [(128, -18, 0.26), (357.7, -1.5, 0.15), (566, -5.5, 0.17), (948, -19, 0.17),
                 (1543, -11.5, 0.13), (2870, -30, 0.28), (3110, -18, 0.15), (5200, -29.5, 0.12)]
    # f/Hz, level/dB, t60/s
    door_modes = [(125.7, -0.5, 0.3), (348.7, -3, 0.38), (852, -11, 0.46), (1130, -26, 0.25),
                  (1520, 3, 0.18), (2200, -7, 0.27), (3200, -8, 0.24), (4150, -17, .2)]
    echoes = split(diffuse(np.ones_like, PORT_LIKENESS, PORT_BALANCE, size=2 * SR), BAND_EDGES_HZ)
    colour = lambda hz: attenuation_scalar(along(SHEET_COLOUR, hz))
    sheet = diffuse(colour, PORT_LIKENESS, PORT_BALANCE, size=2 * SR)
    crash = split(patchy(sheet, depth_db=2), BAND_EDGES_HZ)
    power = np.bincount(BAND_COLOUR, np.mean(crash ** 2, axis=(1, 2)))
    crash = crash / np.sqrt(power[BAND_COLOUR])[:, None, None]
    rack = struck(rack_hits, rack_modes, echoes, crash * attenuation_scalar(-7.5), ring_db=-9.5, rise=0.0019,
                  blow_t60=0.043, blow_db=-5.5, boom_db=-0.5, sizzle_db=-10)
    pan = struck(pan_hits, pan_modes, echoes, crash * attenuation_scalar(-6.5), ring_db=-2.0, rise=0.0076,
                 blow_t60=0.085, blow_db=2.0, boom_db=0.5, sizzle_db=-18)
    door = struck(door_hits, door_modes, echoes, crash * attenuation_scalar(-6.0), ring_db=-13.0, rise=0.0122,
                  blow_t60=0.08, blow_db=3.5, boom_db=5.0, sizzle_db=-3.5)
    return attenuation_scalar(-5.5) * (rack + pan + door) + snaps(crash[-1]) + snaps(crash[-1])


def scene():
    background = appliances() + lens_motor() + rustles() + drone()
    moving = wires() + singing_and_thumps() + sliding()
    contacts = panels_and_squeaks() + knocks() + clatter()
    return background + moving + contacts


def top_cut(x):
    return signal.sosfilt(signal.butter(12, 14640, fs=SR, output="sos"), x)


def record(dry):
    mix = filtered(dry, lambda hz: hz < 14640)
    return top_cut(mix)


dry = scene()
out = record(dry)
pcm_store(out)
```